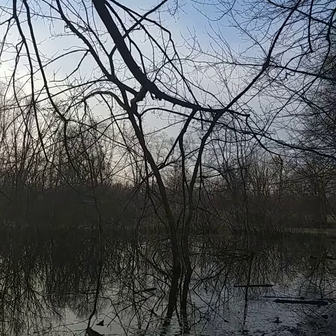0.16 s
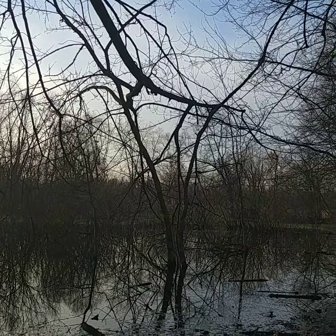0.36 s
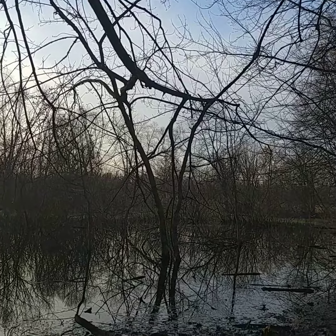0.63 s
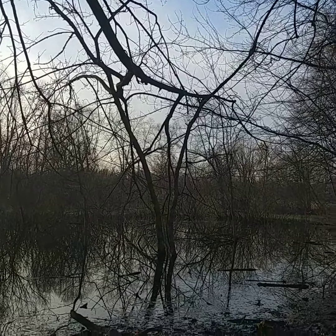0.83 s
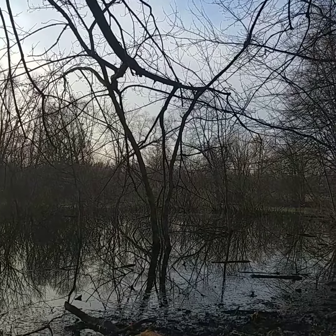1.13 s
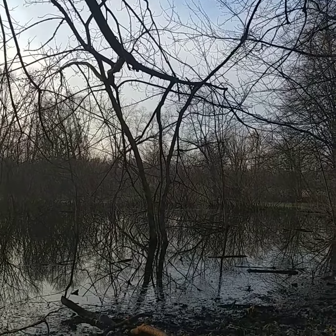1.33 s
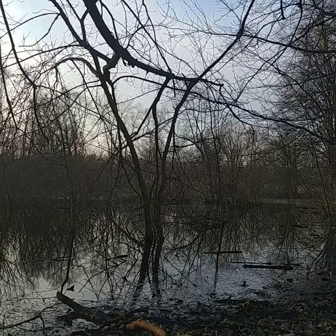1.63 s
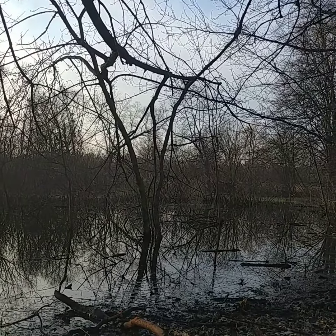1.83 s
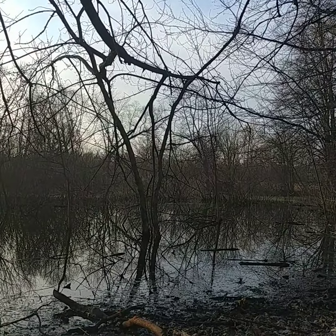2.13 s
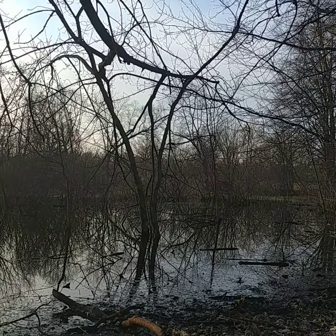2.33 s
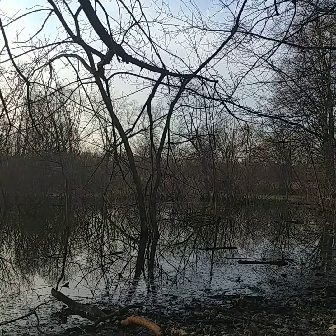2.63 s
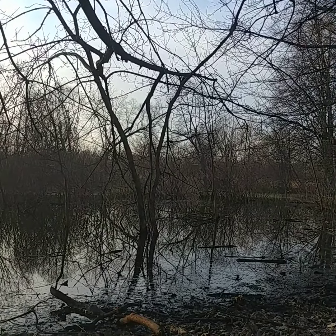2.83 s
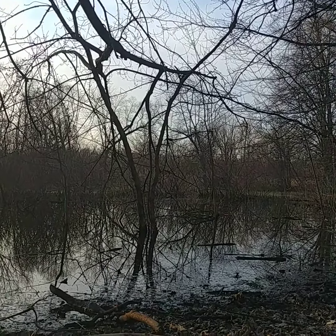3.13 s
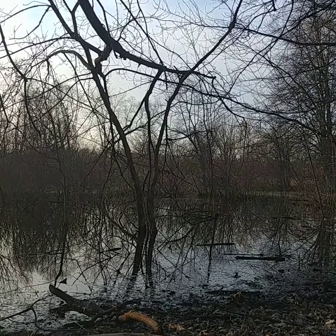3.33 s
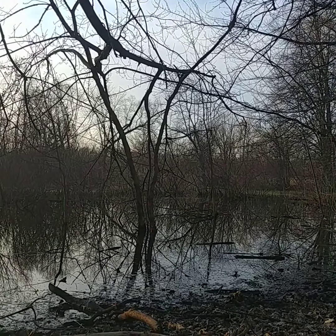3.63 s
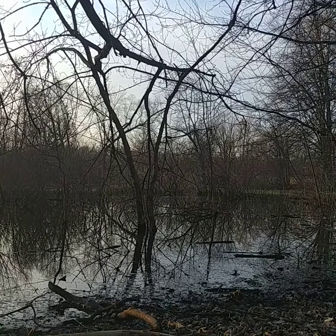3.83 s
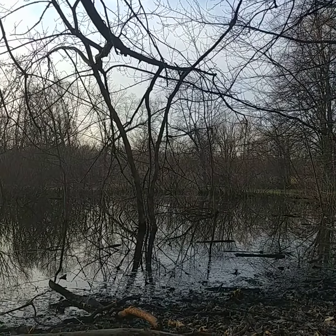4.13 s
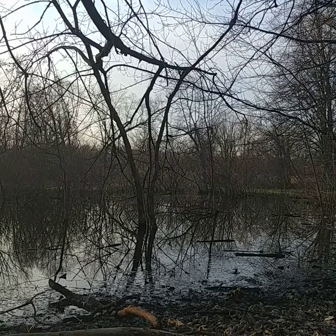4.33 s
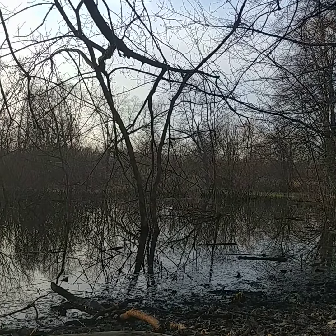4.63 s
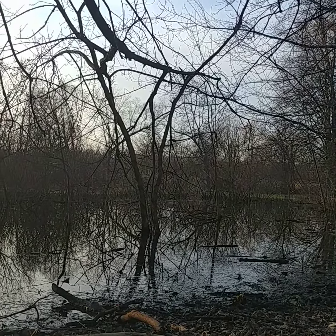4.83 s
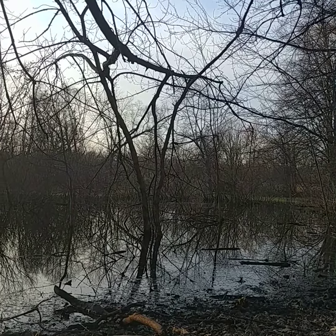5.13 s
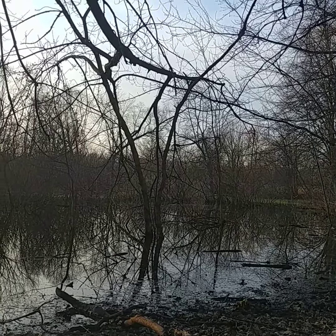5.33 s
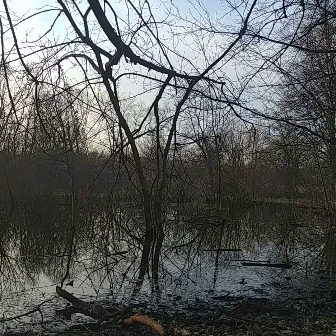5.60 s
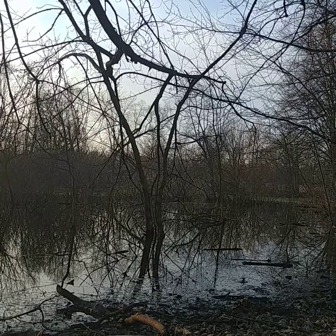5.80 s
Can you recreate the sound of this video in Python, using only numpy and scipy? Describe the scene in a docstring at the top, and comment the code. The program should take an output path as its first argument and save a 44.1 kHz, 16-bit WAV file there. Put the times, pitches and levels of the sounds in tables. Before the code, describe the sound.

At a pond among trees, frogs quack near and far from start to finish in a quick, pulsing, overlapping din, each call leaving a short echo. Much quieter are a small frog's knocking trills, scattered high bird chips and, towards the end, a blackbird's brief warble. Behind everything are a faint far hum, road rumble and microphone hiss, with the calls leaning slightly left.

```python
"""Frogs quack near and far at a woodland pond at dusk: larynx pulses ring vocal sac and throat.
One small frog trills in quick knocks; birds flick, chip and scold in gliding notes, and a blackbird
warbles on both sides of its voice. Trunks scatter every call into a short tail.
Behind them: a far machine hum, road rumble, microphone hiss and three dry clicks."""
import sys
import numpy as np
from scipy import signal
from scipy.fft import rfft, irfft
from scipy.io import wavfile
from scipy.ndimage import uniform_filter1d

SR = 44100
rng = np.random.default_rng(int(sys.argv[2]) if len(sys.argv) > 2 else 0)


def int16_out(signal):
    """Quantize to a 16-bit WAV file."""
    q = np.round(np.clip(np.atleast_2d(signal).T, -1, 1) * 32767)
    wavfile.write(sys.argv[1], SR, q.astype(np.int16))


N = 262836
LEFT_DB = 4.5  # left over right: the left port is more open


def undb(db):
    """dB to amplitude."""
    return 10 ** (np.asarray(db) / 20)


def unit(x):
    """Scale to RMS 1."""
    return x / np.sqrt(np.mean(x ** 2))


def ring(x, hz, *widths_hz):
    """Two-pole resonances in series, one per width; gain 1 at the centre."""
    for width_hz in widths_hz:
        x = signal.lfilter(*signal.iirpeak(hz, hz / width_hz, fs=SR), x)
    return x


def add(out, start_s, x, pan_db, lag_samples=0):
    """Mix x into out; pan and lag are left minus right."""
    i = int(start_s * SR)
    x = x[max(8 - i, 0):max(N - 8 - i, 0)]  # 8 samples of room for the lag
    i = min(max(i, 8), N - 8)
    out[0, i + lag_samples:i + lag_samples + len(x)] += x * undb(pan_db / 2)
    out[1, i:i + len(x)] += x * undb(-pan_db / 2)


def curve(table):
    """Per-sample tracks from rows of time_s, values."""
    time_s, *columns = np.transpose(table)
    return [np.interp(np.arange(N) / SR, time_s, c) for c in columns]


def walk(rate_hz):
    """Slewed random steps, RMS 1."""
    k = int(SR / rate_hz)
    return unit(uniform_filter1d(np.repeat(rng.standard_normal(N // k + 1), k), k)[:N])


def coloured(spectrum, mid_share):
    """Shaped stereo noise, RMS 1; mid_share of the power is in phase at both ports."""
    hz, db = np.transpose(spectrum)
    bins_hz = np.maximum(np.fft.rfftfreq(N, 1 / SR), 1)
    gain = undb(np.interp(np.log(bins_hz), np.log(hz), db))
    mid, side = irfft(rfft(rng.standard_normal((2, N))) * gain, N)
    return unit(np.sqrt(mid_share) * mid + np.sqrt(1 - mid_share) * side * np.array([[1], [-1]]))


def trunk_scatter(x, t60_s, wet_db, spread):
    """Add a dense echo tail; spread is its unshared-to-shared amplitude ratio at the ports."""
    t = np.arange(int(.9 * SR)) / SR
    shared, left, right = rng.standard_normal((3, len(t)))
    tail = (shared + spread * np.array([left, right])) * undb(-60 * t / t60_s)
    tail *= np.minimum(t / .0014, 1)
    tail /= np.sqrt(np.sum(tail ** 2, axis=1, keepdims=True))
    return x + undb(wet_db) * signal.fftconvolve(x, tail, axes=1)[:, :N]


def machine_hum(pitch_hz=89.72):
    """Far machine: two wavering partials."""
    # time_s, fundamental_db, octave_db
    levels = [(0.0, -56, -87), (0.06, -57, -83), (0.78, -51.5, -59.5), (2.51, -51, -64.5),
              (2.79, -48.5, -57), (3.07, -51, -69), (3.32, -49, -59.5), (4.73, -44, -55.5),
              (5.21, -49.5, -68), (5.66, -41.5, -57.5), (5.96, -47, -65)]
    fundamental_db, octave_db = curve(levels)
    phase = 2 * np.pi * np.cumsum(pitch_hz + .589 * walk(6)) / SR
    fundamental = undb(fundamental_db + walk(3.79)) * np.sin(phase)
    octave = undb(octave_db + 1.36 * walk(4.5)) * np.sin(2 * phase)
    return np.sqrt(2) * (fundamental + octave)


def road_rumble():
    """Low road noise, drifting in level."""
    # freq_hz, relative_density_db
    spectrum = [(15, -18.5), (25, -56.5), (61, -1.5), (91, 0), (111, -2.5), (139, -5.5), (195, -9.5),
                (284, -18), (500, -28), (650, -52), (1100, -120)]
    # time_s, level_db
    levels = [(0.0, -55.5), (0.3, -52.5), (1.2, -51), (2.2, -51), (3.2, -50.5), (4.2, -50), (5.1, -46),
              (5.96, -50)]
    return coloured(spectrum, mid_share=.97) * undb(curve(levels)[0] + .78 * walk(2.987))


def microphone_hiss(level_db=-61):
    """Near-steady broadband noise."""
    # freq_hz, relative_density_db
    spectrum = [(300, -8.5), (600, 3.5), (2500, -1), (4000, -10), (6500, -20), (10000, -25), (15500, -19.5)]
    return coloured(spectrum, mid_share=.54) * undb(level_db + .9 * walk(7))


def ticks():
    """Dry clicks close to the microphone: fast-damped sines."""
    # start_s, level_db, pitch_hz
    clicks = [(1.7696, -43, 7500), (2.686, -55, 7450), (2.783, -46.5, 7820)]
    out, t = np.zeros((2, N)), np.arange(400) / SR
    envelope = (1 - np.exp(-t / .0003)) * np.exp(-t / .00085)
    for start_s, db, hz in clicks:
        add(out, start_s, undb(db) * envelope * np.sin(2 * np.pi * hz * t), pan_db=-2.5)
    return out


def slur(start_hz, end_hz, length_s, rasp_hz, ease):
    """Gliding bird note; rasp_hz is the depth of a fast random pitch shake."""
    u = np.linspace(0, 1, int(length_s * SR))
    shake = unit(uniform_filter1d(rng.standard_normal(4000), size=32))[:len(u)]
    hz = end_hz + (start_hz - end_hz) * (1 - u) ** ease + rasp_hz * np.tanh(shake)
    beak_gain = (hz / max(start_hz, end_hz)) ** 1.3  # the beak favours the higher end
    return beak_gain * np.sin(np.pi * u) ** .5 * np.sin(2 * np.pi * np.cumsum(hz) / SR)


def bird_flicks(rise_hz=2030):
    """One bird flicks upward about once a second."""
    # start_s, level_db, top_hz, pan_db
    flicks = [(-.03, -62, 7500, 9), (1.297, -64.5, 7400, 14), (2.537, -58.5, 7570, 9),
              (3.339, -52, 7330, 8.5), (4.359, -49.5, 7460, 12), (5.182, -48.5, 7240, 9)]
    out = np.zeros((2, N))
    for start_s, db, top_hz, pan_db in flicks:
        note = slur(top_hz - rise_hz, top_hz, length_s=.017, rasp_hz=115, ease=2.48)
        add(out, start_s, undb(db) * note, pan_db - LEFT_DB)
    return out


def bird_scold(start_s=1.008, pan_db=6):
    """One harsh call: three falling bands at once."""
    # start_hz, end_hz, level_db, length_s, rasp_hz
    bands = [(4200, 3650, -57, 0.055, 200), (4850, 4700, -42.5, 0.065, 500), (6400, 6200, -58, 0.077, 990)]
    out = np.zeros((2, N))
    for start_hz, end_hz, db, length_s, rasp_hz in bands:
        add(out, start_s, undb(db) * slur(start_hz, end_hz, length_s, rasp_hz, ease=2.53), pan_db - LEFT_DB)
    return out


def bird_notes():
    """Single gliding bird notes, including the blackbird's opening whistles."""
    # start_s, level_db, start_hz, end_hz, length_s, rasp_hz, pan_db
    notes = [(1.964, -70, 4930, 4060, 0.047, 60, 5), (2.121, -59, 2410, 3000, 0.041, 90, 0),
             (2.293, -57, 2540, 3050, 0.031, 89.5, -4), (2.605, -66.5, 7870, 7500, 0.044, 500, 7),
             (4.515, -68, 6250, 6420, 0.055, 60, 17), (4.56, -60, 6480, 6160, 0.071, 82.5, 1),
             (4.613, -61, 3840, 4520, 0.027, 600, 4), (4.56, -65.5, 3460, 3400, 0.029, 40, 0),
             (4.814, -54, 3910, 3400, .025, 60, -4), (5.644, -68, 3540, 3680, 0.085, 59.6, 0),
             (5.839, -63, 6970, 6370, 0.035, 300, 2)]
    out = np.zeros((2, N))
    for start_s, db, *glide, pan_db in notes:
        add(out, start_s, undb(db) * slur(*glide, ease=2.96), pan_db - LEFT_DB)
    return out


def bird_chips(first_hz=5200, fall_hz=560, sag_hz_per_s=380, pan_db=8):
    """An even, fading row of falling chips, each a little lower."""
    # start_s, level_db
    chips = [(2.097, -62), (2.252, -65.5), (2.408, -70), (2.568, -69), (2.725, -76), (2.88, -75)]
    out = np.zeros((2, N))
    for start_s, db in chips:
        hz = first_hz - sag_hz_per_s * (start_s - chips[0][0])
        note = slur(hz, hz - fall_hz, length_s=.027, rasp_hz=160, ease=1.24)
        add(out, start_s, undb(db) * note, pan_db - LEFT_DB)
    return out


def warble(syllables, shake, throb, air_hz, air_width_hz):
    """One side of the voice: falling saw-tooth sweeps, every second one weaker, then turbulent air."""
    edge_s, glide_s, swell_db_per_s = .009, .012, 1.5
    sweep_rate_hz, buzz_start_s, air_db = 82, 4.93, -10
    t = np.arange(N) / SR
    columns = np.transpose(syllables)
    current = np.maximum(np.searchsorted(columns[0], t) - 1, 0)
    start_s, length_s, start_hz, end_hz, db, depth_hz = columns[:, current]
    age_s = t - start_s
    centre_hz = start_hz + (end_hz - start_hz) * np.clip(age_s / length_s, 0, 1)
    centre_hz = uniform_filter1d(centre_hz, int(glide_s * SR))
    gate = np.clip(np.minimum(age_s, length_s - age_s) / edge_s, 0, 1)
    gate *= undb(db + swell_db_per_s * np.abs(age_s))
    cycle = np.cumsum(sweep_rate_hz * (1 + .17 * walk(25))) / SR
    pitch_hz = centre_hz + depth_hz * (1 - 2 * (cycle % 1) + shake * walk(700))
    swing = np.sin(np.pi * cycle)
    beat = (.5 + swing ** 2 * (1 + throb * swing)) * undb(1.3 * walk(60))
    air = unit(ring(rng.standard_normal(N), air_hz, air_width_hz, air_width_hz))
    air *= undb(air_db) * np.clip((t - buzz_start_s) / .011, 0, 1)
    return gate * beat * (np.sin(2 * np.pi * np.cumsum(pitch_hz) / SR) + air)


def blackbird(beak_cutoff_hz=6100):
    """Two sides of the voice sing together, low-passed by the beak."""
    # both: start_s, length_s, start_hz, end_hz, level_db, warble_depth_hz
    high_syllables = [(4.665, 0.026, 5000, 5200, -63, 8.7), (4.703, 0.046, 5170, 5180, -64, 110),
                      (4.77, 0.056, 5230, 5520, -70, 15), (4.828, 0.075, 5680, 5620, -68, 15),
                      (4.9, 0.0344, 5380, 5320, -54, 90), (4.968, 0.025, 5400, 5330, -55, 90),
                      (5.026, 0.043, 5120, 5140, -54, 80), (5.07, 0.45, 5370, 5170, -53, 95)]
    low_syllables = [(4.708, 0.162, 2870, 2950, -55, 330.7), (4.898, 0.012, 3425, 3378, -44, 40),
                     (4.932, 0.082, 2904, 3017, -41.5, 330), (5.016, 0.0517, 3356, 3140, -45.5, 210.4),
                     (5.078, .45, 2806, 2774, -46.5, 108.6)]
    high = warble(high_syllables, shake=.7, throb=.3, air_hz=4600, air_width_hz=1100)
    low = warble(low_syllables, shake=1, throb=.8, air_hz=3150, air_width_hz=1200)
    voice = signal.sosfilt(signal.butter(6, beak_cutoff_hz, fs=SR, output="sos"), high + low)
    return np.array([voice, voice])


def frog_trill(knock_rate_hz=210, rasp_hz=110):
    """Each pulse is a few quick knocks on a small sac; most phrases slow down and rise."""
    # start_s, pulse_count, first_gap_s, last_gap_s, first_hz, last_hz, level_db, end_fade_db
    phrases = [(.739, 16, .0372, .0428, 2700, 3020, -53.5, 12),
               (2.448, 15, .0355, .0445, 2680, 3020, -55, 18), (3.274, 6, .0362, .0405, 2900, 2980, -58, 0),
               (3.498, 3, .0312, .0305, 2920, 2880, -56, 6)]
    out, t = np.zeros((2, N)), np.arange(int(.048 * SR)) / SR
    knocks = 1.3 + .8 * np.cos(2 * np.pi * knock_rate_hz * t)
    knocks *= np.minimum(t / .0017, 1) * np.exp(-(t / .009) ** 2)
    for start_s, count, first_gap_s, last_gap_s, first_hz, last_hz, db, fade_db in phrases:
        times_s = start_s + np.append(0, np.cumsum(np.linspace(first_gap_s, last_gap_s, count - 1)))
        for u, at_s in zip(np.linspace(0, 1, count), times_s):
            gain = undb(db - 3.5 * (1 - u) ** 3 - fade_db * u ** 16 + 2.2 * rng.standard_normal())
            shake = unit(uniform_filter1d(rng.standard_normal(len(t)), size=50))
            hz = first_hz + u * (last_hz - first_hz) + 50 * rng.standard_normal() + rasp_hz * shake
            add(out, at_s, gain * knocks * np.sin(2 * np.pi * np.cumsum(hz) / SR), pan_db=.3)
    return out


def quack(sac_hz, length_s, throat_db, rasp_trim_db, swell_power):
    """Uneven, breathy larynx pulses under a swell ring the vocal sac and the throat."""
    # modes for a 1700 Hz sac: centre_hz, width_hz, relative_db
    throat_modes = [(906, 190, -10), (1168, 313, -6.5), (2860, 200, -22.5), (6200, 1570, -25.5)]
    pulse_hz, sac_width_hz, puff_decay_s = 258.35, 463, .0048
    rasp_centre_hz, rasp_width_hz = 3000, 1100
    at_s = np.cumsum(np.exp(.18 * rng.standard_normal(20)) / pulse_hz) - 1 / pulse_hz
    swell = np.sin(np.pi * np.clip(at_s / length_s, .06, 1) ** .74) ** swell_power
    strength = undb(3 * rng.standard_normal(20)) * swell * (at_s < length_s)
    pulses = np.zeros(int(.14 * SR))
    np.add.at(pulses, np.clip(at_s * SR, 0, len(pulses) - 1).astype(int), strength)
    puffs = signal.lfilter([.11], [1, -np.exp(-1 / (puff_decay_s * SR))], pulses)  # air after each pulse
    larynx = pulses + puffs * rng.standard_normal(len(pulses))
    push = signal.lfilter(*signal.butter(2, 2600, fs=SR), larynx)
    sac = ring(push, sac_hz, sac_width_hz, 1.23 * sac_width_hz)
    voice = signal.lfilter(*signal.butter(2, 2700, fs=SR), sac)
    voice += undb(rasp_trim_db - 28.5) * ring(larynx, rasp_centre_hz, *[rasp_width_hz] * 3)
    pitch_scale = (sac_hz / 1700) ** .72  # a small frog is higher all over
    for hz, width_hz, db in throat_modes:
        gain = undb(db + throat_db + 2.4 * rng.standard_normal())
        voice += gain * ring(push, hz * pitch_scale, width_hz, 2 * width_hz)
    return voice / np.sqrt(np.sum(sac ** 2) / (.12 * length_s * SR))


def far_frogs(count=400):
    """A chorus of overlapping quacks, random in pitch, level and side."""
    # time_s, level_db
    levels = [(0.0, -52.5), (0.36, -48.5), (1.24, -45), (2.3, -48.5), (3.37, -50), (4.5, -48),
              (5.53, -44.5), (5.96, -48.5)]
    out = np.zeros((2, N))
    for start_s in np.linspace(-.08, N / SR - .03, count):
        pan, loudness = rng.standard_normal(2)
        lag, pitch, timing = np.tanh(rng.standard_normal(3))
        sac_hz = 1620 * np.exp(.19 * pitch)
        call = quack(sac_hz, length_s=.044, throat_db=1.97, rasp_trim_db=-25, swell_power=1.2)
        add(out, start_s + .012 * timing, undb(1.24 * loudness) * call, 1.5 * pan, int(6.6 * lag))
    return unit(out) * undb(curve(levels)[0])


def near_frogs(length_s=.052):
    """Quacks that stand out, each from its own side."""
    # middle_s, level_db, sac_hz, rasp_trim_db
    quacks = [(0.041, -37.5, 1540, -15), (0.112, -33.5, 1530, -18), (0.177, -34.5, 1620, 3),
              (0.243, -30, 1550, -11), (0.3, -33, 1740, -14), (0.351, -38, 1630, 4), (0.41, -34, 1610, -14),
              (0.465, -33, 1580, -15), (0.525, -35.5, 1640, -6), (0.577, -32, 1680, -4),
              (0.63, -41, 1530, -5), (0.696, -30.5, 1650, 1), (0.77, -32, 1630, 2), (0.875, -38.5, 1610, 6),
              (0.915, -38.5, 1580, 9), (0.959, -35, 1570, 3), (1.02, -39, 1560, 19), (1.055, -47, 1670, 15),
              (1.114, -33, 1870, 12), (1.201, -30.5, 1710, 5), (1.273, -36, 1920, -3),
              (1.33, -33, 1410, -21), (1.379, -32.5, 1740, -9), (1.417, -32, 1650, 2),
              (1.497, -31, 1740, 3), (1.588, -39, 1650, -8), (1.643, -33.5, 1710, -17),
              (1.681, -35, 1530, -16), (1.747, -36, 1500, -8), (1.819, -35.5, 1510, -17),
              (1.906, -37, 1730, -16), (1.963, -36, 1480, -10), (1.996, -32.5, 1770, 2),
              (2.05, -37.5, 1510, -2), (2.122, -38.5, 1780, 9), (2.191, -35.5, 2030, -2),
              (2.282, -37.5, 1820, -11), (2.322, -34.5, 1840, 4.5), (2.359, -36.5, 1530, -8),
              (2.405, -39, 1620, 8), (2.459, -31, 1905, 4), (2.637, -36.5, 1590, 11),
              (2.811, -34.5, 1810, 10), (2.963, -38.5, 1780, -5), (3.046, -40, 1780, -9),
              (3.232, -32.5, 1810, 6), (3.301, -33, 1780, 1), (3.541, -35, 1760, -9),
              (3.647, -42, 1720, -11), (3.682, -36.5, 1740, -18), (3.75, -36, 1710, -6),
              (3.825, -37, 1630, -14), (3.96, -38, 1700, -4), (4.063, -37.5, 1820, 5),
              (4.165, -37, 1750, 3), (4.198, -42, 1720, -6), (4.324, -40.5, 1740, 0),
              (4.384, -29.5, 1820, -1), (4.438, -35, 1730, 3), (4.67, -32, 1830, -6),
              (4.717, -32.5, 2100, -1), (4.828, -38, 1780, 2), (4.901, -35, 1710, 13.5),
              (4.935, -32, 1830, 9), (5.004, -30.5, 1760, 4), (5.163, -36.5, 1580, 4),
              (5.246, -33.5, 1840, 2), (5.278, -35, 1840, 1), (5.315, -26.5, 1860, 5),
              (5.405, -43, 1800, 3), (5.489, -44, 1660, -3), (5.544, -35, 1800, -2),
              (5.615, -33.5, 1820, 7), (5.656, -35.5, 1930, 8.5), (5.796, -33.5, 1875, 3),
              (5.83, -38, 1500, -2), (5.862, -26, 1910, 9.5), (5.928, -37.5, 1680, -9)]
    out = np.zeros((2, N))
    for middle_s, db, sac_hz, trim_db in quacks:
        call = quack(sac_hz, length_s, throat_db=-4, rasp_trim_db=trim_db, swell_power=1.5)
        pan_db, lag = rng.standard_normal(2)
        add(out, middle_s - .48 * length_s, undb(db) * call, pan_db, int(4.8 * np.tanh(lag)))
    return out


def scene():
    """Calls with their echoes over hum, rumble and hiss, at two microphone ports."""
    song = trunk_scatter(blackbird(), t60_s=.3, wet_db=.5, spread=2.5)  # clearing
    song = trunk_scatter(song, t60_s=.75, wet_db=-11, spread=3.2)  # far woods
    frogs = trunk_scatter(near_frogs() + far_frogs(), t60_s=.17, wet_db=-7, spread=1)
    trill = trunk_scatter(frog_trill(), t60_s=.25, wet_db=-4, spread=.72)
    chips = trunk_scatter(bird_chips(), t60_s=.25, wet_db=-3, spread=3)
    birds = trunk_scatter(bird_flicks() + bird_scold() + bird_notes(), t60_s=.3, wet_db=1, spread=3.1)
    lows = (machine_hum() + road_rumble()) * undb([[-.6], [.6]])
    ports = (lows + ticks() + birds + chips + song + trill + frogs) * undb([[LEFT_DB / 2], [-LEFT_DB / 2]])
    ports[0] = np.roll(ports[0], 1)  # the left port hears a sample late
    return ports + microphone_hiss()


def record(dry):
    """The phone cuts the treble above 15750 Hz."""
    return signal.sosfilt(signal.ellip(14, .2, 60, 15750, fs=SR, output="sos"), dry)


dry = scene()
out = record(dry)
int16_out(out)
```